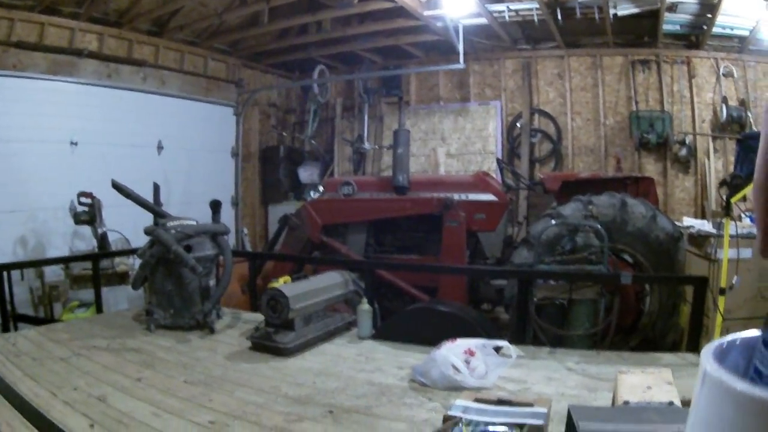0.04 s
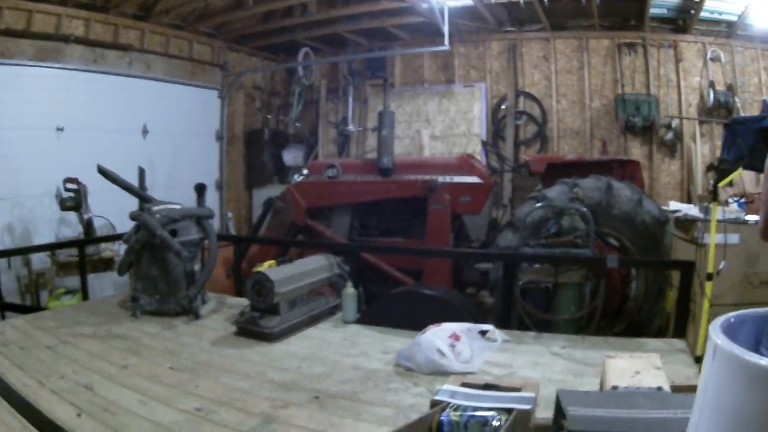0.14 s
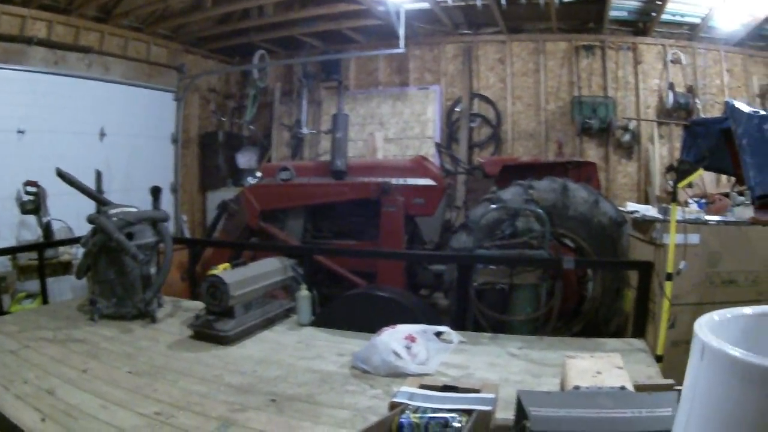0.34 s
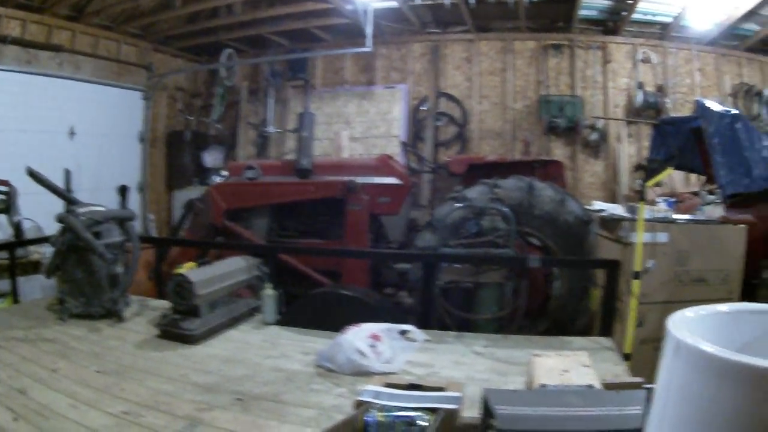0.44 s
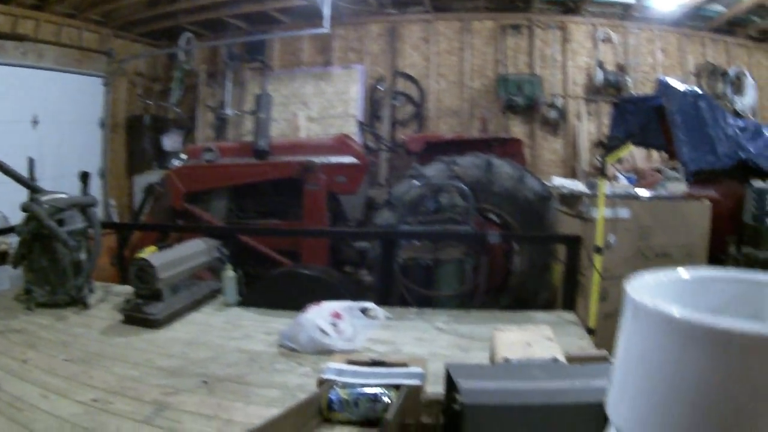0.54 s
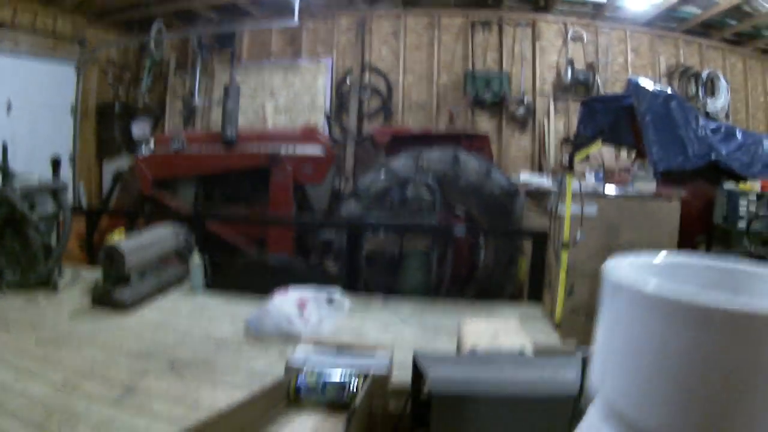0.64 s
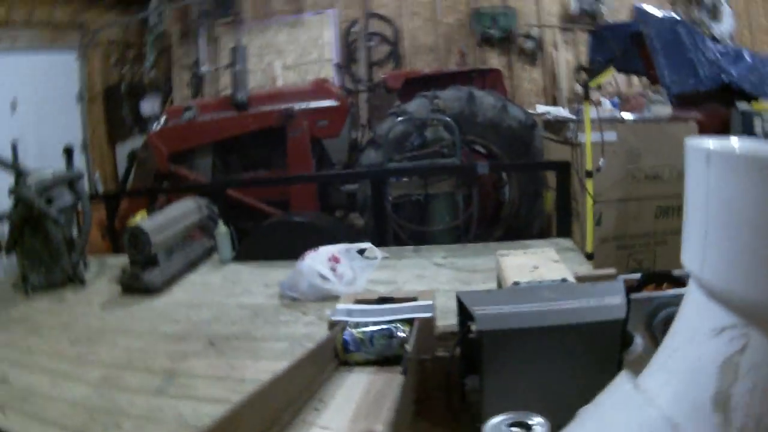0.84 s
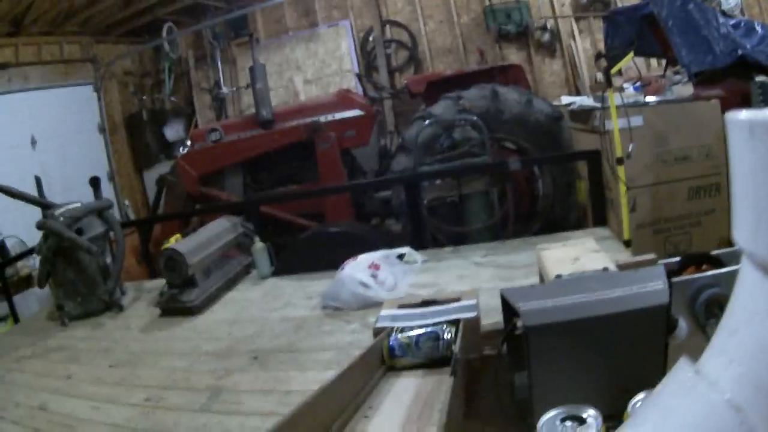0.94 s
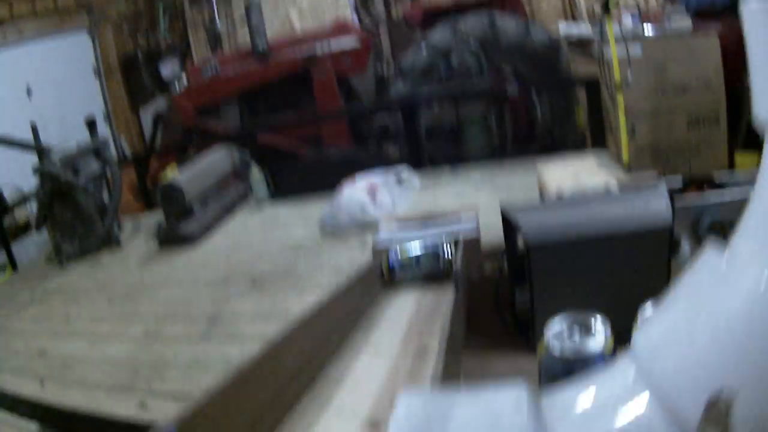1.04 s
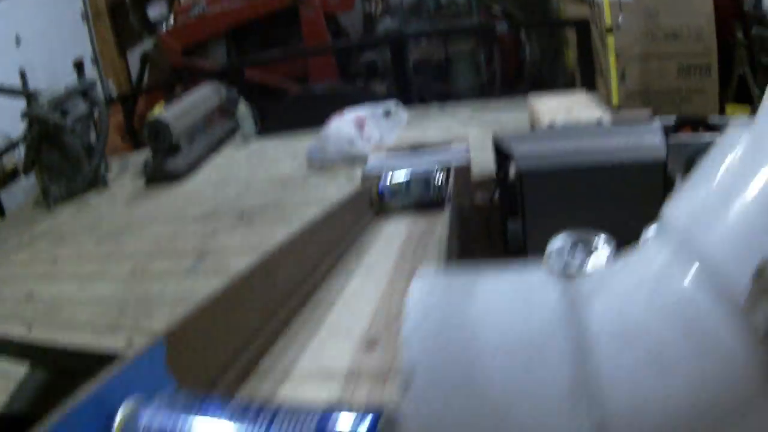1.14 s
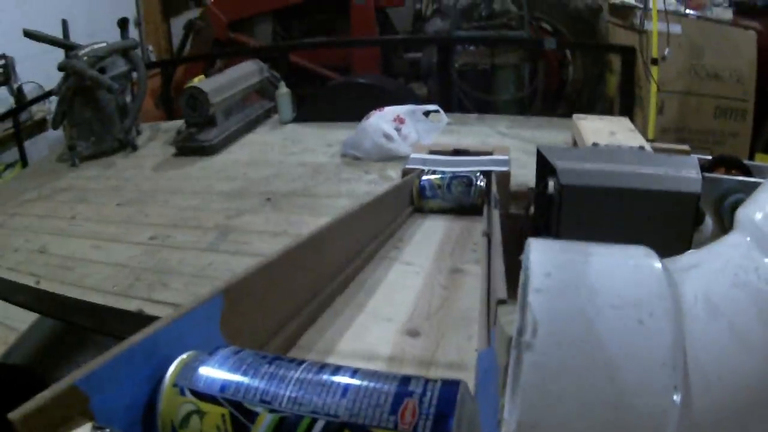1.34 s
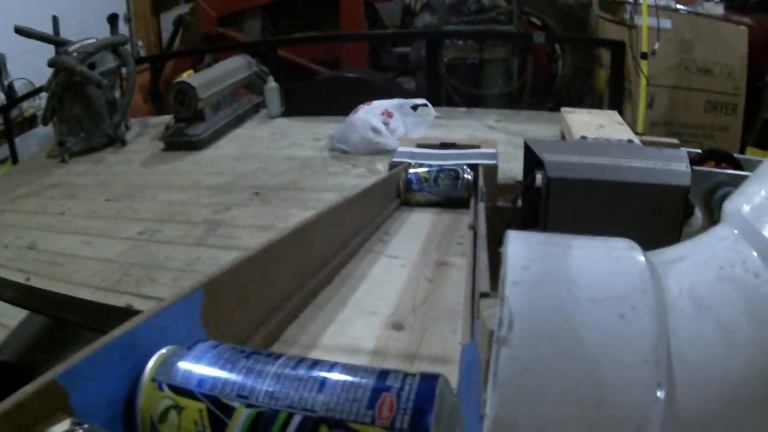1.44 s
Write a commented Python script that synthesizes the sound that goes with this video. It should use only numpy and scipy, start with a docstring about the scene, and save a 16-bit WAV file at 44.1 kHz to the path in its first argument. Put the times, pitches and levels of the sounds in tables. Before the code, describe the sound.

A metal can clatters down a plastic pipe, tapping lightly at first, then rattling and sliding with a hollow ring before dying away. Soft thuds and rustling come from the close microphone, over a low workshop rumble.

```python
"""A drink can knocks and slides down a plastic pipe towards a wooden chute, in a workshop.
Heard close up on the microphone of a hand-held camera, which is bumped and rustles as it moves.
Each knock rings the air in the pipe, whose resonances shift as the can travels.
The recorder holds each sample at a low rate, which mirrors the ring into a thin metallic sizzle."""
import sys
import numpy as np
from scipy import signal
from scipy.fft import rfft, irfft, next_fast_len
from scipy.io import wavfile
from scipy.ndimage import map_coordinates

SR = 44100
rng = np.random.default_rng(int(sys.argv[2]) if len(sys.argv) > 2 else 0)


def dump_mix(stems):
    """Bounce the given channels to the path in sys.argv[1] as a 16-bit WAV at rate SR."""
    frames = np.atleast_2d(stems).T  # one column per channel
    limited = np.clip(frames, -1, 1)  # hard clip at full scale
    pcm = np.round(limited * 32767).astype(np.int16)
    wavfile.write(sys.argv[1], SR, pcm)


N = 66150
T = np.arange(N) / SR
HOLD_HZ = 12000  # the recorder's sample-and-hold rate
BUILD_S = 0.00067  # ring and rattle take a moment to swell

# knocks of the can, relative levels: t/s, low boom/dB, middle/dB, upper ring/dB, crack/dB, clack/dB
KNOCKS = [(.001, -28, -46, -52, -81, -75), (0.07, -38.5, -56, -81, -98, -56),
          (0.219, -18.5, -73, -26, -44.5, -27), (.254, -45, -40, -24.5, -77, -47),
          (.276, -23, -41.5, -28.5, -48, -49), (.291, -19.5, -32, -31.5, -39, -24.5),
          (.303, -36, -26, -25, -44, -37), (0.3182, -14, -27, -19, -39, -13),
          (.326, -32, -39.5, -41.5, -52, -36), (.341, -31, -13, -23.5, -30, -36),
          (.357, -23, -37, -30, -39.5, -46), (0.377, -36, -43.5, -48, -45.5, -49),
          (0.3999, -34, -16.5, -19.5, -41.5, -19.5), (.425, -24.5, -35, -40, -66, -33),
          (.462, -19, -18, -14.5, -32.5, -22), (0.508, -25.5, -30.5, -37.5, -39.5, -24),
          (.529, -24, -58, -30, -45, -46.5), (.575, -26, -50, -30.5, -49.5, -55),
          (.609, -27.5, -58, -36, -57, -37), (.634, -22, -30, -28, -44.5, -26.5),
          (0.6672, -15, -30, -28, -40, -19), (.722, -29, -33, -39, -46.5, -36),
          (.763, -48, -34, -34, -45.5, -30), (0.815, -37, -27, -45.5, -43, -44),
          (.885, -32, -81, -52.5, -57, -40), (.907, -33.5, -40.5, -47, -63.5, -37),
          (0.954, -55.5, -60, -66, -51.5, -53), (1.445, -52, -59, -63, -84, -53),
          (1.471, -52, -47, -57, -67, -40), (1.478, -61, -49.5, -52, -70, -43.5)]
# how hard the can rubs along the pipe: t/s, level/dB
SLIDE = [(0, -65), (.21, -70), (.23, -32.5), (.33, -31.5), (.44, -35.5), (.5, -36), (.6, -36.5),
         (.7, -38.5), (.82, -43), (.92, -50), (.96, -62.5), (1.42, -92.5), (1.5, -52.5)]


def amp(db):
    """Decibels to gain."""
    return 10 ** (np.asarray(db) / 20)


def unit(x):
    """Scale to rms 1."""
    return x / np.sqrt(np.mean(x ** 2) + 1e-20)


def along(points, hz):
    """Read (f/Hz, value) points at hz, on a log frequency axis."""
    freqs, values = np.transpose(points)
    return np.interp(np.log(hz + 1), np.log(freqs + 1), values)


def curve(rows):
    """Join (t/s, value) points into one value per sample."""
    return np.interp(T, *np.transpose(rows))


def gesture(rows):
    """Gain from (t/s, level/dB) points, silent before the first and after the last."""
    return amp(curve(rows)) * (T >= rows[0][0]) * (T <= rows[-1][0])


def decay(start, t60, rise):
    """An envelope that swells from start and dies away; all times in seconds."""
    age = np.maximum(T - start, 0)
    return (1 - np.exp(-age / rise)) * np.exp(-np.log(1000) * age / t60)


def filtered(x, response):
    """Filter x by a gain given as a function of frequency."""
    size = next_fast_len(N + 8192)
    return irfft(rfft(x, size) * response(np.fft.rfftfreq(size, 1 / SR)), size)[..., :N]


def noise(spectrum):
    """Coloured noise of rms 1 inside the recorder's band."""
    white = rng.standard_normal(N)
    return unit(filtered(white, lambda hz: amp(along(spectrum, hz)) * (hz < HOLD_HZ / 2)))


def grainy(x, rate_hz, depth_db):
    """Break a steady noise into random grains."""
    knots = rng.standard_normal(N // 8)
    return unit(x * amp(depth_db * map_coordinates(knots, [T * rate_hz], mode="wrap")))


def room_tone():
    """The workshop's steady low rumble."""
    # spectrum of the rumble: f/Hz, relative density/dB
    rumble_colour = [(15, -17.5), (25, -2.5), (82, -6), (141, -8), (239, -10), (267, -20.5), (368, -19),
                     (855, -34.5), (2730, -38), (5800, -46.5), (7540, -72), (12800, -120)]
    return amp(-51) * noise(rumble_colour)


def knock_colour(low, middle, upper, crack):
    """How hard a knock drives each frequency: f/Hz, level/dB."""
    return [(340, low), (520, middle), (760, middle), (880, upper), (1200, upper), (1600, crack)]


def resonance(pitch_hz, t60, gain):
    """One resonance, struck by the knocks and rubbed by the slide; pitch and gain may move."""
    # how the rubbing feeds the resonances: f/Hz, gain/dB
    rub_colour = [(200, 9), (320, -2.5), (500, 3), (650, -11.5), (950, -2.5), (1100, 3.5), (1400, -14),
                  (2100, -29)]
    ring_pole = np.exp(-np.log(1000) / (t60 * SR))
    build_pole = np.exp(-1 / (BUILD_S * SR))
    centre_hz = np.mean(pitch_hz)
    rub = amp(curve(SLIDE) + along(rub_colour, centre_hz))
    drive = rub * np.sqrt(1 - ring_pole ** 2) * rng.standard_normal(N)
    for start, *levels, _ in KNOCKS:
        drive[round(start * SR)] += amp(along(knock_colour(*levels), centre_hz))
    # shift the drive down by the pitch, let it swell and decay, then shift it back up
    carrier = np.exp(2j * np.pi * np.cumsum(pitch_hz) / SR)
    envelope = signal.lfilter([1 - build_pole], np.poly([ring_pole, build_pole]), gain * drive / carrier)
    return (carrier * envelope).imag


def pipe_ring():
    """Three gliding air resonances, and steady modes whose share changes as the can descends."""
    # the low, middle and upper air resonances following the can, each: t/s, f/Hz
    boom_glide = [(0, 315), (.22, 303.5), (.28, 273), (.33, 298), (.45, 352), (.57, 359), (.68, 299.6),
                  (.76, 287.8), (.88, 321.7)]
    ring_glide = [(.22, 920.5), (.29, 916.4), (.34, 932), (.41, 896.5), (.47, 918.6), (.56, 933.5),
                  (.95, 938.6)]
    upper_glide = [(.22, 1032), (.3, 1012), (.36, 1076), (.46, 1014), (.52, 1061), (.6, 1078), (.65, 1029),
                   (.85, 1013), (.95, 1032)]
    # modes of pipe and can: f/Hz, gain with the can at the top/dB, at the bottom/dB, t60/s
    modes = [(228, -21, -19.5, 0.17), (269, -12.5, -16.5, .07), (424, -34, -26, .06),
             (506.4, -26.5, -7.5, 0.3), (591.6, -10.5, -19, .1), (715, 0.5, -23.5, 0.036),
             (800.4, -19, -14, 0.39), (992.2, -4, -20, 0.14), (1171.6, -10.5, -25.5, 0.18),
             (1207.3, -13, -11, 0.082), (1396, -14.5, -19.5, .2), (1638, -5, -16.5, .06),
             (2097, -5.5, -11, 0.098)]
    top_s, bottom_s = 0.36, 0.479  # the can passes from the upper into the lower pipe
    ring = resonance(curve(boom_glide), t60=0.12, gain=amp(-0.5))
    ring += resonance(curve(ring_glide), t60=0.16, gain=amp(0.5))
    ring += resonance(curve(upper_glide), t60=0.2, gain=amp(-7.5))
    for k, (hz, top_db, bottom_db, t60) in enumerate(modes):
        coupling = amp(curve([(top_s, top_db), (bottom_s, bottom_db)]))
        ring += (-1) ** k * resonance(np.full(N, hz), t60, coupling)
    return ring


def can_knocks():
    """Each contact gives a toneless clack, a hard first tick, a crack and a rattling tail."""
    # spectrum of tick, crack and rattle: f/Hz, relative density/dB
    crack_colour = [(300, -18), (1200, -4.5), (1800, 2.5), (2700, -8), (4300, -7), (6000, -14.5)]
    rise_s = 0.000677
    hits = np.zeros(N)
    for start, low, middle, upper, crack, clack in KNOCKS:
        body = knock_colour(low - 4, middle, upper, crack)
        clack_colour = [(100, low - 30), (230, low - 6), *body, (2800, crack - 22)]
        hits += amp(clack - 1) * noise(clack_colour) * decay(start, t60=0.025, rise=rise_s)
        tick = amp(-0.5) * decay(start, t60=0.0081, rise=0.0004)
        snap = amp(-15.5) * decay(start, t60=0.067, rise=rise_s)
        rattle = amp(-7.5) * decay(start, t60=0.24, rise=BUILD_S)
        hits += amp(crack) * noise(crack_colour) * (tick + snap + rattle)
    return hits


def can_scrape():
    """Grainy friction as the can slides along the plastic."""
    # spectrum of the scrape: f/Hz, relative density/dB
    scrape_colour = [(100, -13), (300, 15), (1000, 7), (1700, 6.5), (2600, -20.5), (4300, -15.5),
                     (6000, -20)]
    return amp(curve(SLIDE) - 9) * grainy(noise(scrape_colour), rate_hz=510, depth_db=2)


def workshop_tail(x):
    """The room's short reverberation, weak this close to the pipe."""
    tail = rng.standard_normal(N) * decay(0.0043, t60=0.5, rise=0.004)
    return amp(-17) * signal.fftconvolve(x, tail / np.linalg.norm(tail))[:N]


def camera_bumps():
    """Soft bumps on the camera body, each a low thud of a few cycles."""
    # thuds at the microphone: t/s, f/Hz, level/dB, life/cycles
    bumps = [(0.523, 143, -27, 1.9), (0.557, 65.6, -23, 1.7), (0.575, 93, -25.5, 1.3), (.607, 67, -17, 2.2),
             (0.676, 60, -31.5, 1.5), (0.7, 115, -24.5, 1.75), (0.753, 139, -35.5, 6.6),
             (.816, 194, -22.5, 5), (0.821, 57, -32.5, 1.8), (.965, 39.8, -29.5, 3.3),
             (1.087, 78.5, -37.5, 2.1)]
    thuds = np.zeros(N)
    for start, hz, db, life in bumps:
        cycles = np.maximum(T - start, 0) * hz
        age = cycles / (0.14 * life)  # 1 at the envelope's peak
        thuds -= amp(db) * age * np.exp(1 - age) * np.sin(2 * np.pi * cycles)
    return thuds


def camera_rustle():
    """A grainy rustle, probably the hand on the camera, joined by a brighter, smooth brushing hiss."""
    # course of the rustle and of the brushing, each: t/s, level/dB
    rustle_level = [(.543, -67.5), (.553, -39), (.585, -46), (.603, -46), (.617, -37), (.627, -46.5),
                    (.69, -45), (.75, -57.5), (.805, -49.5), (.818, -36.5), (.85, -48.5), (.862, -54.5),
                    (.935, -72.5), (.959, -49), (.977, -74)]
    brush_level = [(.545, -85), (.553, -47.5), (.58, -44.5), (.605, -56), (.63, -62), (.69, -50.5),
                   (.73, -56), (.78, -88.5)]
    # their spectra, each: f/Hz, relative density/dB
    rustle_colour = [(300, 12.5), (1500, -5.5), (2700, -4), (3500, -0.5), (4300, 5.5), (5000, -4.5),
                     (6000, -7.5)]
    brush_colour = [(2500, -20), (4000, -10), (5200, 6.5), (6000, -2.5)]
    rustle = gesture(rustle_level) * grainy(noise(rustle_colour), rate_hz=720, depth_db=2)
    return rustle + gesture(brush_level) * noise(brush_colour)


def scene():
    """The can, the handling noise and the room reach both channels alike."""
    bass_cut = signal.butter(2, 160, "highpass", fs=SR, output="sos")  # the pipe passes no deep bass
    can = pipe_ring() + signal.sosfilt(bass_cut, can_scrape() + can_knocks())
    mid = can + workshop_tail(can) + camera_bumps() + camera_rustle() + room_tone()
    return np.array([mid, mid])


def record(dry):
    """Sample and hold mirrors the sound around the hold rate; the channels differ a little in treble."""
    # diffuse difference between the channels: f/Hz, side relative to mid/dB
    spread = [(60, -50.5), (400, -66), (1400, -74), (2800, -39), (5000, -18), (11000, -25)]
    band_limit_hz = 15800
    narrow = filtered(dry, lambda hz: hz < HOLD_HZ / 2)
    mirrored = narrow * (1 + 2 * np.cos(2 * np.pi * HOLD_HZ * T))
    held = filtered(mirrored, lambda hz: np.sinc(hz / HOLD_HZ))  # holding makes the treble droop
    blur = rng.standard_normal(N) * decay(0, t60=0.08, rise=0.001)
    diffuse = signal.fftconvolve(held, blur[None] / np.linalg.norm(blur))[:, :N]
    side = filtered(diffuse, lambda hz: amp(along(spread, hz)))
    stereo = held + side * np.array([[1], [-1]])
    return filtered(stereo, lambda hz: hz < band_limit_hz)


dry = scene()
out = record(dry)
dump_mix(out)
```